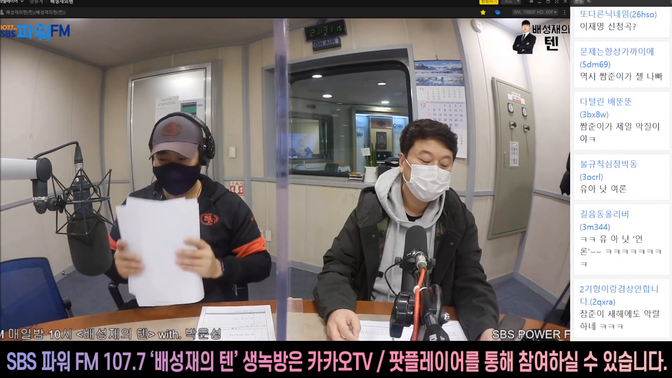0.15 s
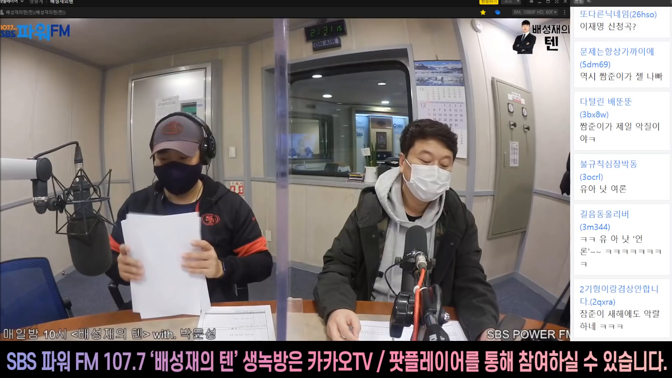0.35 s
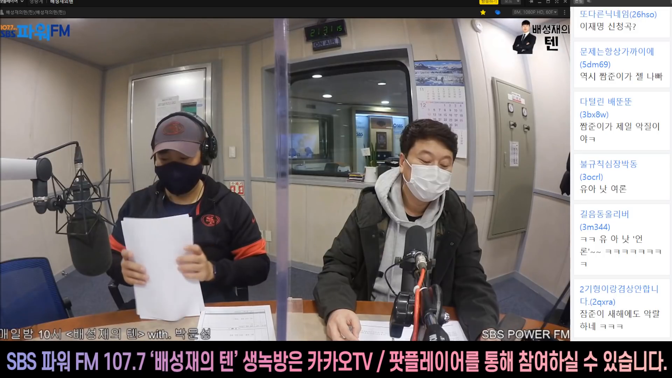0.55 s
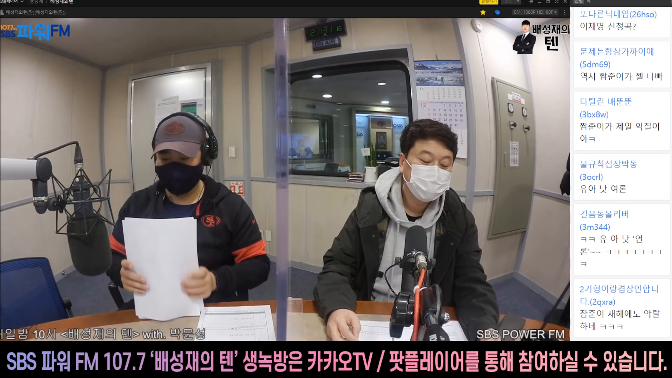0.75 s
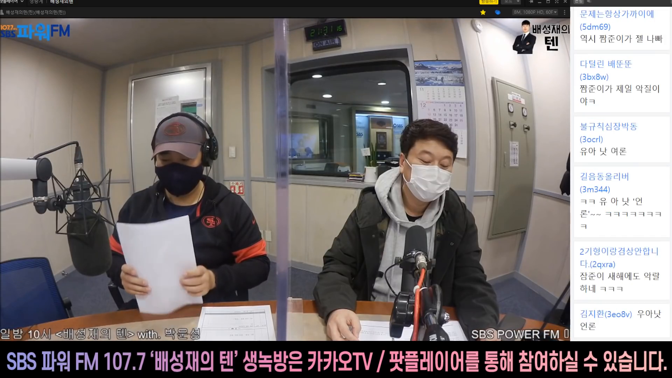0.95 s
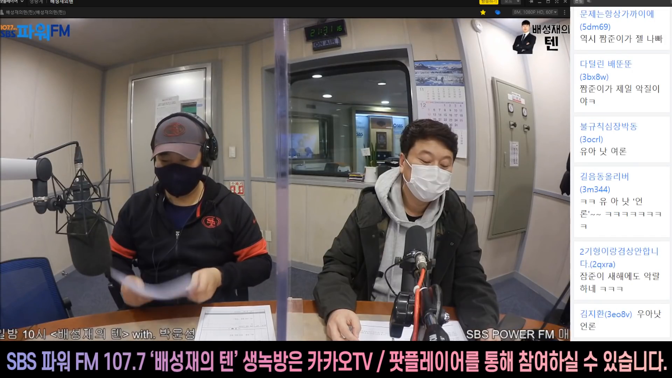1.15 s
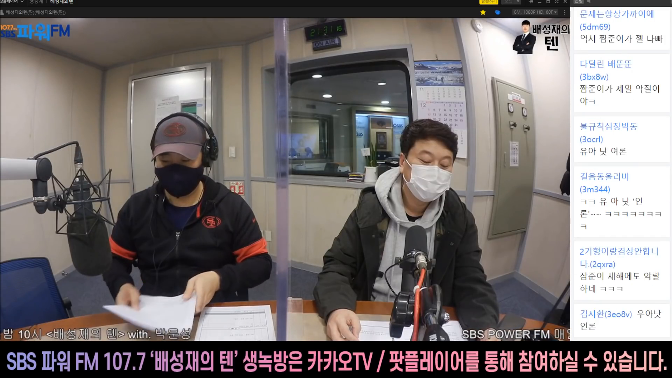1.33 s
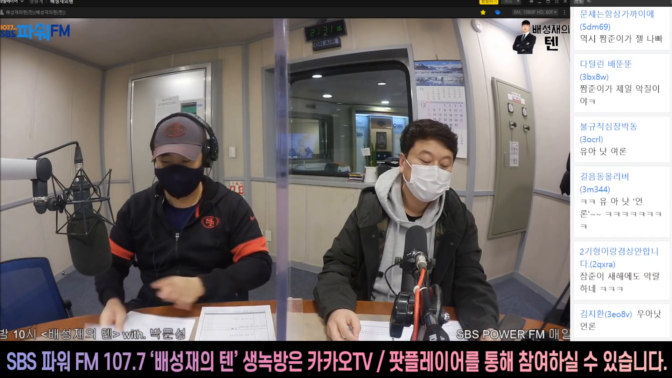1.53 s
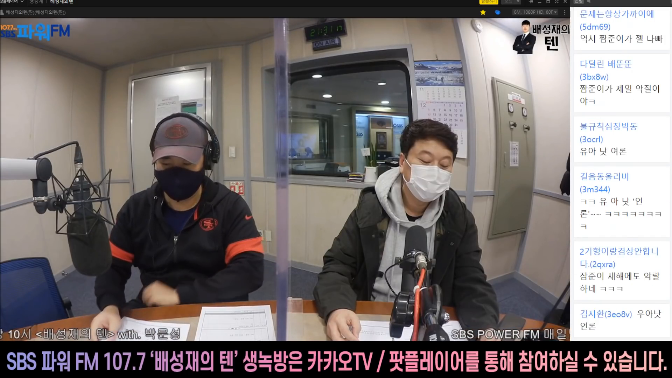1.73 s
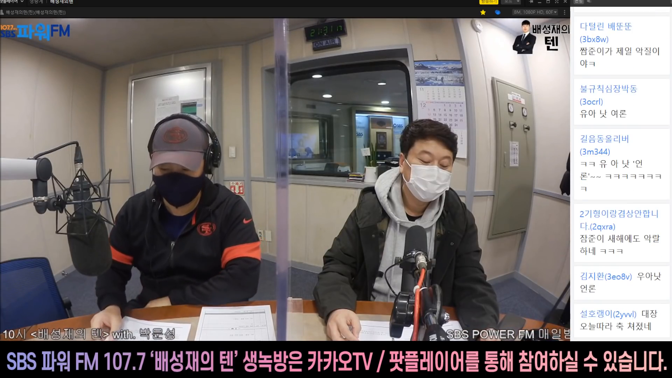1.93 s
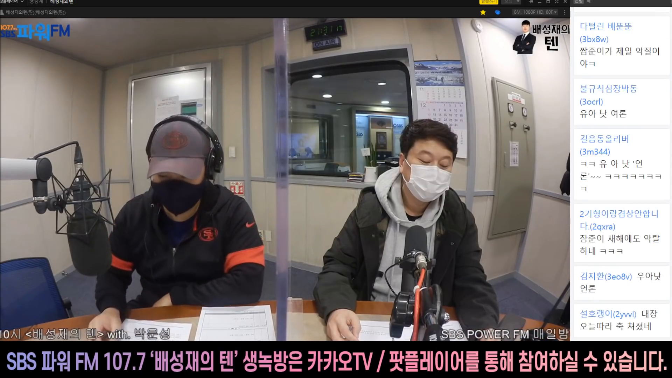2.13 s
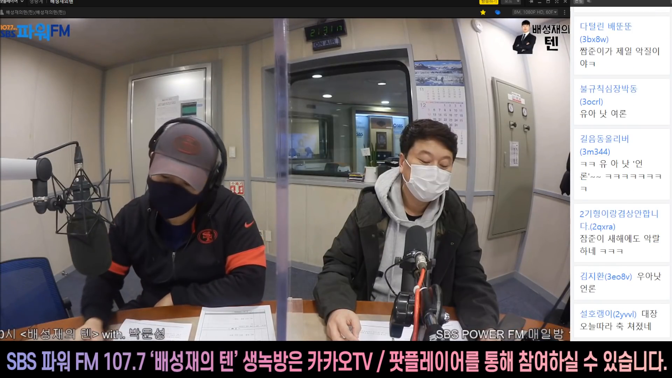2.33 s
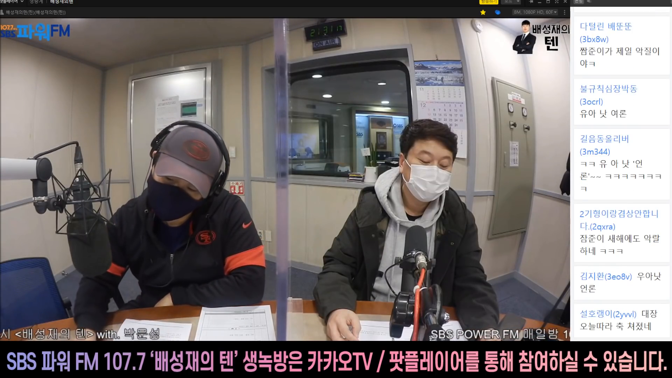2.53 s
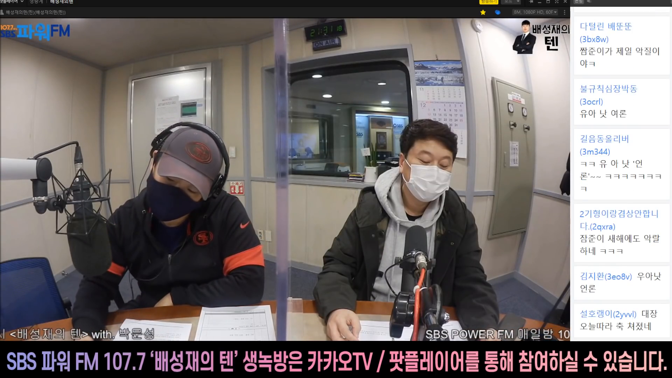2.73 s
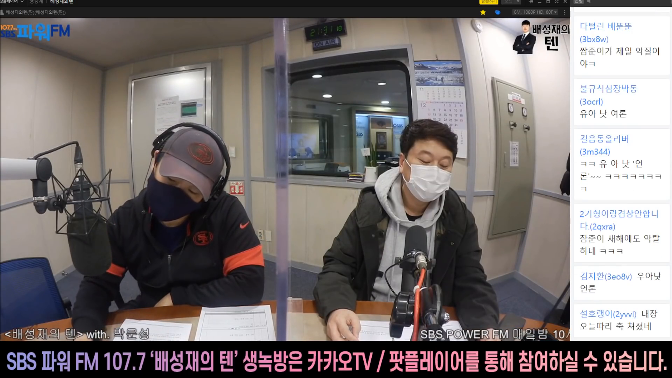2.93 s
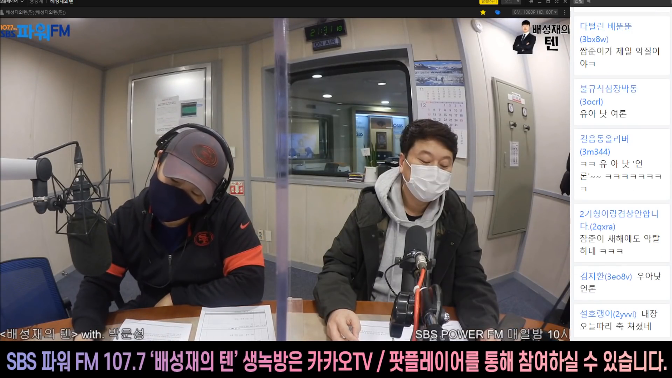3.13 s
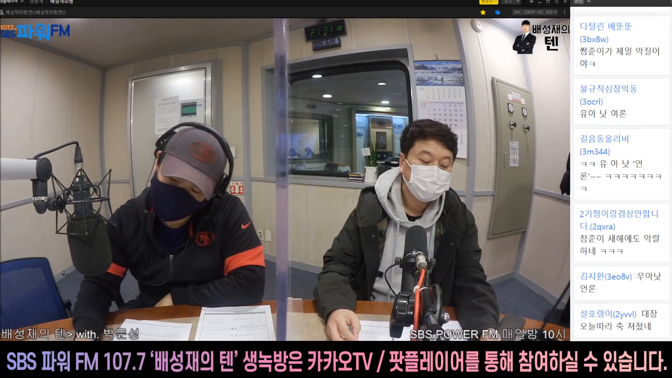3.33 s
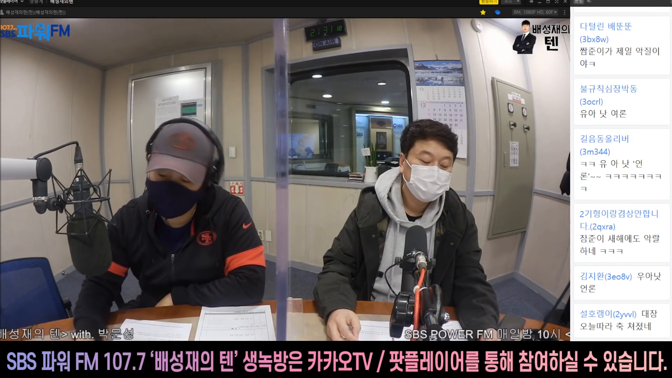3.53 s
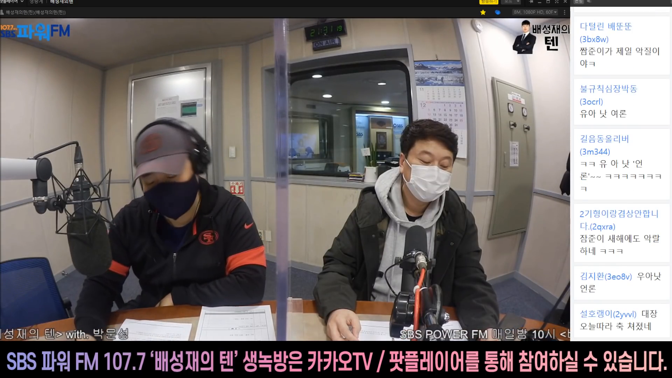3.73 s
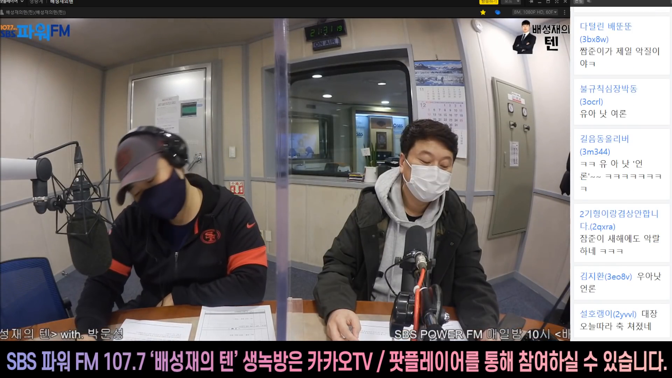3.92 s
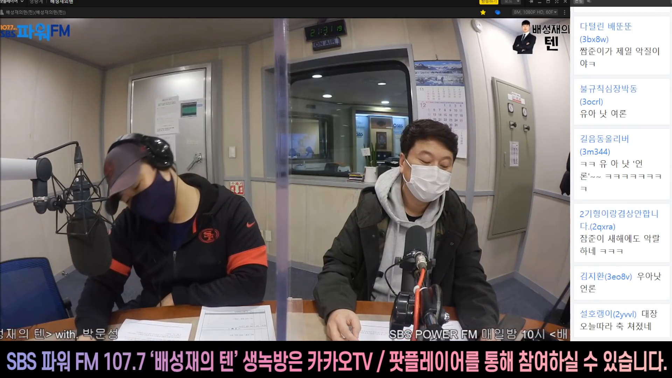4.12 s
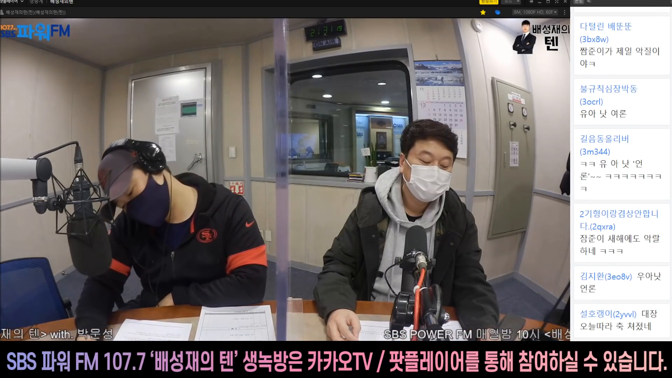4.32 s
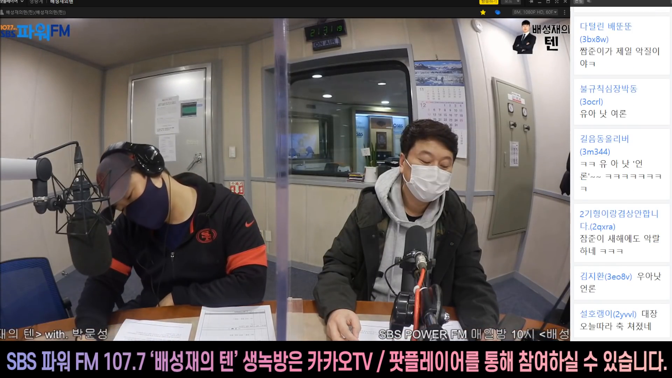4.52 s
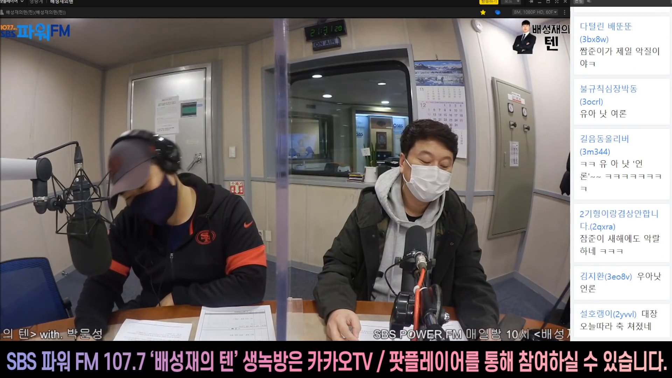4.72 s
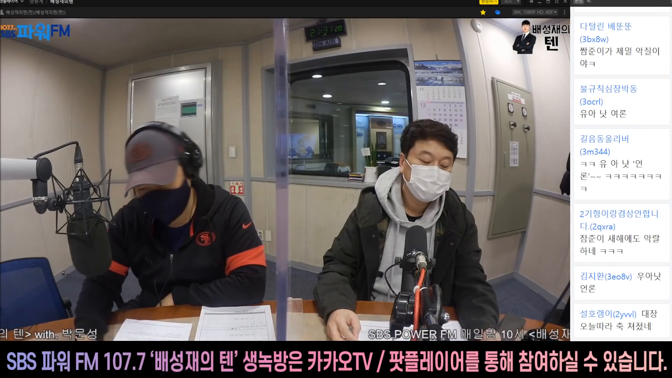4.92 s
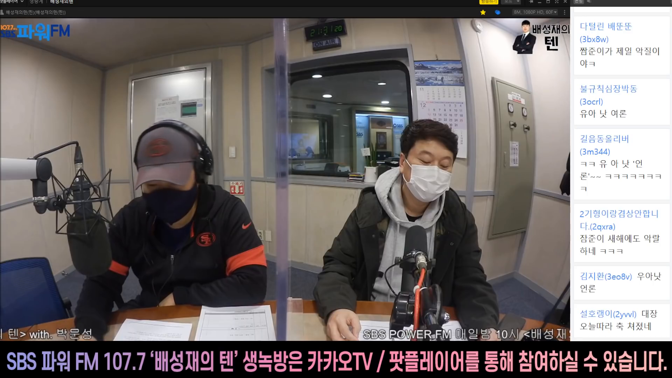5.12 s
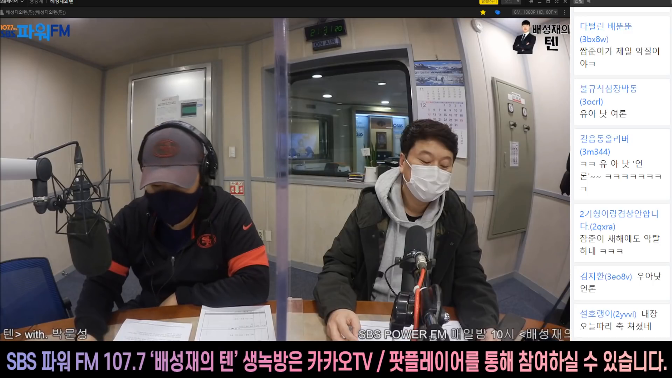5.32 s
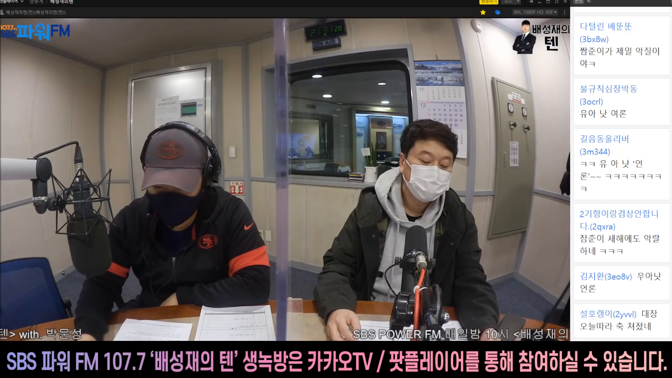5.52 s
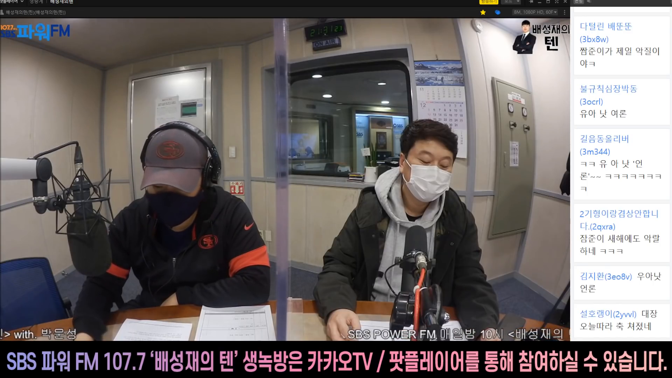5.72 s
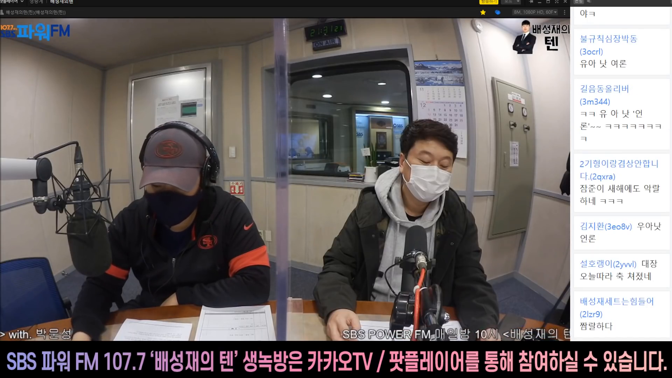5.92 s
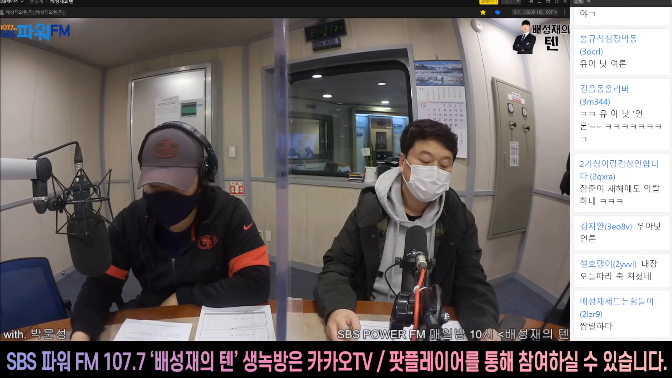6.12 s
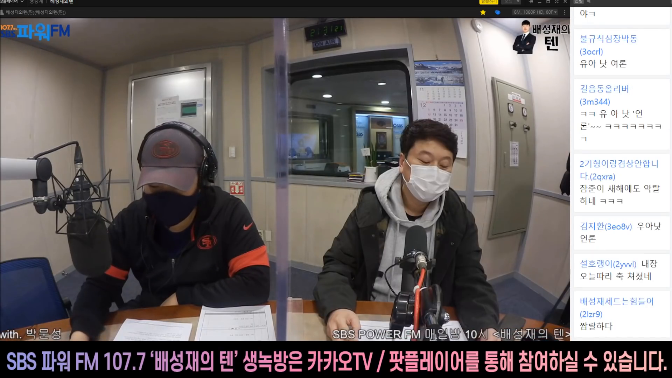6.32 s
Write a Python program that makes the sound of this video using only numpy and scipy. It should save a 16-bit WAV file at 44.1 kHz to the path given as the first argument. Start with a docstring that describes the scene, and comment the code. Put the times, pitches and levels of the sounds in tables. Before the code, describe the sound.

Close to a desk microphone in a small, dry studio, paper sheets rustle and crackle in quick strokes. A loud tap squares the stack at half a second, more shuffling follows, then a bright snap near 1.8 seconds as the sheets slide away. After a quiet gap come small ticks, a soft desk thump, a fine crackle and clicks, over faint ventilation.

```python
"""In a quiet, damped studio, sheets of paper are shuffled, squared on a desk and slid aside;
later small things tick and knock on the desk. Rubbing, crackle and knocks are filtered noise,
taps are damped rings with cracks, snaps are brief pulses, and thumps are decaying desk modes.
One microphone on the desk feels the low thump, over ventilation noise and a few thin equipment
tones; both channels carry the same signal."""
import sys
import numpy as np
from scipy import signal
from scipy.fft import rfft, irfft
from scipy.io import wavfile
from scipy.ndimage import uniform_filter1d

SR = 44100
rng = np.random.default_rng(int(sys.argv[2]) if len(sys.argv) > 2 else 0)


def dump_mix(stems):
    """Bounce the given channels to the path in sys.argv[1] as a 16-bit WAV at rate SR."""
    frames = np.atleast_2d(stems).T  # one column per channel
    limited = np.clip(frames, -1, 1)  # hard clip at full scale
    pcm = np.round(limited * 32767).astype(np.int16)
    wavfile.write(sys.argv[1], SR, pcm)


N = 284797  # length [samples]


def gain_of(db):
    """Level law: 20 dB is a factor of ten in amplitude."""
    return 10 ** (np.asarray(db) / 20)


def evened(x):
    """Normalization of x to unit rms amplitude."""
    return x / np.sqrt(np.mean(x ** 2) + 1e-20)


def coloured(x, points):
    """Linear filtering by a spectrum of (frequency [Hz], gain [dB]) points, joined over log frequency."""
    f, db = np.transpose(points)
    hz = np.fft.rfftfreq(len(x), 1 / SR)
    curve_db = np.interp(np.log(hz + 1), np.log(f + 1), db)
    return irfft(rfft(x) * gain_of(curve_db), len(x))


def around(hz, skirt_db):
    """Broad resonance: a hump of colour centred on hz."""
    return [(hz / 8, 2 * skirt_db), (hz / 2, skirt_db), (hz, 0), (hz * 1.33, skirt_db), (hz * 4, 3 * skirt_db)]


def add(mix, s, sound):
    """Superposition: adds a sound to the mix from time s [s]."""
    part = mix[round(s * SR):][:len(sound)]
    part += sound[:len(part)]


def patchy(x, patch_db, flicker_db):
    """Random modulation: drifting patches of colour and a flicker shared by all pitches."""
    z = signal.stft(x, nperseg=256, noverlap=192)[2]
    chance = rng.standard_normal(z.shape)
    across_pitch = uniform_filter1d(chance, size=3, axis=0)
    patches = evened(uniform_filter1d(across_pitch, size=36, axis=1))
    flicker = evened(uniform_filter1d(rng.standard_normal(z.shape[1]), size=5))
    varied = z * gain_of(patch_db * patches + flicker_db * flicker)
    return evened(signal.istft(varied, nperseg=256, noverlap=192)[1][:N])


def rubbing():
    """Stick-slip friction: fibres catch and slip thousands of times a second; each slip excites the sheet."""
    # colours of the scrape, the flutter of the sheet and the hiss of the fibres:
    # (frequency [Hz], gain [dB])
    scrape = [(900, -38), (1800, 1), (2600, 4.5), (4000, 2), (6000, -6), (8000, -26)]
    flutter = [(150, -16), (350, -3), (900, 1), (1600, -2), (2500, -30.5)]
    fibres = [(3500, -27.5), (5200, -5.5), (7000, 2.5), (9000, -2), (11500, -6.5), (14000, -27),
              (17000, -35.5)]
    # strokes of sheet on sheet, some over a long light contact: (start [s], length [s], rise [s],
    # scrape level [dB], flutter level [dB], hiss level [dB], change to the end [dB])
    strokes = [(0, 1.67, .01, -54, -57.5, -58.5, -5.5), (0, 0.057, 0.00092, -48.5, -50, -60, -14),
               (0.071, 0.13, 0.029, -48, -52, -48, 3.5), (0.239, 0.17, .03, -45.5, -59, -53, -5),
               (0.413, 0.081, 0.044, -44, -56.5, -46.5, 0), (0.502, 0.033, 0.0092, -60, -61, -37, -5),
               (0.631, 0.057, 0.022, -42, -46.5, -36.5, -3), (0.698, 0.047, .02, -40.5, -49, -45.5, 4.5),
               (0.775, .15, 0.027, -46.5, -51.5, -50.5, -3.5), (0.911, 0.1, .06, -43, -55, -51, 3.5),
               (1.033, 0.11, 0.027, -45.5, -59, -48.5, -3), (1.195, 0.072, 0.021, -51.5, -53, -58.5, 3.5),
               (1.281, 0.086, 0.016, -50.5, -71, -55.5, -5), (1.38, .13, 0.035, -53, -60, -60.5, -1),
               (1.515, 0.063, 0.026, -59, -60.5, -59, 0), (1.708, 0.1, 0.036, -47.5, -48.5, -57.5, -4.5),
               (1.794, 0.44, 0.044, -50.5, -57, -54, -17.5), (2.216, 0.051, 0.021, -59, -63.5, -62, -2),
               (2.262, 0.6, 0.061, -68.5, -65.5, -62.5, -5), (3.839, 0.032, 0.0076, -58, -61, -79, -6.5),
               (3.921, 0.052, 0.037, -68, -53.5, -82, -1.5), (4.064, .14, .02, -80, -62, -73, -2.5),
               (4.208, .2, 0.049, -74.5, -66.5, -74, -0.5), (4.443, 0.12, .02, -72, -56.5, -84, -8.5),
               (4.803, 0.015, .01, -58.5, -71, -77, -5), (5.047, 0.093, .04, -80, -76, -75, -2),
               (5.196, 0.27, 0.035, -75, -69.5, -69.5, -6), (5.438, 0.13, 0.017, -67, -70, -70, -3)]
    slips_per_s, lift_db_per_s = 9000, 400  # a stroke dies away when the hand lifts

    sizes = gain_of(0.69 * np.minimum(rng.exponential(1, N), 6.0))
    slips = sizes * rng.standard_normal(N) * (rng.random(N) < slips_per_s / SR)
    slips = patchy(slips, patch_db=2.5, flicker_db=0.18)
    layers = np.array([evened(coloured(slips, colour)) for colour in (scrape, flutter, fibres)])
    t, power = np.arange(N) / SR, np.zeros(layers.shape)
    for start, length, rise, *levels_db, change_db in strokes:
        at = slice(round(start * SR), round((start + length) * SR) + SR // 4)
        since = t[at] - start
        change = change_db * np.minimum(since / length, 1)
        lift = lift_db_per_s * np.maximum(since - length, 0)
        shape = np.clip(since / max(rise, .001), 0, 1) * gain_of(change - lift)
        power[:, at] += (gain_of(levels_db)[:, None] * shape) ** 2  # overlapping strokes add in power
    return (np.sqrt(power) * layers).sum(axis=0)


def air():
    """Stationary background: broadband ventilation noise, a fuzzy high whine and thin steady sinusoids."""
    # ventilation spectrum: (frequency [Hz], relative level per Hz [dB])
    ventilation = [(15, -67.5), (25, -40), (74, -11.5), (130, -0.5), (212, -6.5), (363, -11), (575, -16),
                   (659, -15.5), (775, -17), (887, -16), (1610, -20), (1740, -19.5), (2050, -24),
                   (9320, -30), (16000, -45)]
    # narrow band of the whine: (frequency [Hz], gain [dB])
    whine_band = [(9150, -46), (9330, -3), (9400, 0), (9450, -4.5), (9600, -42)]
    # steady equipment tones: (frequency [Hz], rms level [dB])
    steady_tones = [(1723, -74.5), (1938, -78)]
    ventilation_db, whine_db = -62, -86.5  # rms levels

    noise = evened(coloured(rng.standard_normal(N), ventilation))
    whine = gain_of(whine_db) * evened(coloured(rng.standard_normal(N), whine_band))
    t, tones = np.arange(N) / SR, np.zeros(N)
    for hz, db in steady_tones:
        tones += gain_of(db) * np.sqrt(2) * np.sin(2 * np.pi * (hz * t + rng.random()))
    return gain_of(ventilation_db) * patchy(noise, patch_db=1.0, flicker_db=0.55) + tones + whine


def taps():
    """Impact excitation: each contact is a short unsteady ring and a dying crack of noise."""
    # taps and crumples: (time [s], ring level [dB], ring frequency [Hz], ring T60 [s],
    # crack level [dB], crack frequency [Hz])
    contacts = [(.004, -33, 720, 0.017, -45, 3190), (.089, -34, 2230, .024, -39, 3840),
                (0.132, -31.5, 635, 0.03, -32, 4580), (.247, -38.5, 950, .02, -29.5, 4070),
                (.324, -33.5, 1160, .039, -36, 2600), (.512, -6, 932, 0.022, -12.5, 2550),
                (0.526, -23, 870, 0.035, -30, 3400), (.53, -18.5, 1270, 0.019, -24, 3780),
                (.542, -21, 796, 0.021, -37, 2530), (.553, -38, 595, .018, -47, 2620),
                (.667, -49, 1900, .022, -27, 2660), (.697, -37, 2150, .015, -28, 3800),
                (.725, -17, 2260, 0.014, -18.5, 2500), (0.738, -27, 2080, 0.027, -24.5, 2810),
                (.831, -26, 1165, 0.064, -35.5, 2600), (0.93, -31.5, 1620, 0.031, -38, 3040),
                (1.015, -34, 2060, .026, -28.5, 3230), (1.108, -34, 1290, .022, -35, 4170),
                (1.198, -37, 1290, 0.025, -49, 3780), (1.212, -34.5, 2130, .022, -40, 2650),
                (1.232, -28, 910, 0.027, -47, 2000), (1.257, -31, 1386, 0.039, -31.5, 2600),
                (1.454, -39.5, 633, 0.034, -37, 3600), (1.466, -28.5, 1590, 0.02, -44, 2790),
                (1.487, -26, 850, 0.011, -51, 3330), (1.549, -40.5, 620, 0.032, -40.5, 3580),
                (1.672, -24.5, 950, .02, -46, 2560), (1.689, -36, 885, 0.039, -43.5, 2610),
                (1.725, -36, 996, .025, -52, 2646), (1.736, -31.5, 914, .035, -42, 3300),
                (1.755, -27.5, 900, 0.041, -38, 6980), (1.775, -18, 1745, 0.015, -37, 2600),
                (1.822, -31.5, 885, .048, -45, 2510), (2.243, -46.5, 980, .031, -62, 6280),
                (3.499, -39.5, 1163, 0.045, -61.5, 3220), (3.739, -52.5, 1140, 0.027, -58, 2510),
                (3.841, -38, 1080, 0.016, -44.5, 4730), (3.921, -33.5, 1003, 0.032, -49, 3370),
                (3.957, -34.5, 1100, .034, -38.5, 2380), (3.98, -55, 870, .017, -44, 2490),
                (4.058, -34, 855, 0.02, -53, 3640), (4.077, -41.5, 1266, 0.077, -38.5, 4730),
                (4.113, -43, 1090, 0.02, -49, 2590), (4.156, -34, 1515, 0.055, -40.5, 2780),
                (4.437, -24.5, 2180, 0.019, -26.5, 8400), (4.443, -30.5, 1213, .034, -29, 2600),
                (4.515, -29, 1220, 0.068, -39.5, 5000), (4.808, -46.5, 2070, 0.042, -44.5, 7600),
                (4.847, -39.5, 710, 0.012, -50.5, 3000), (6.383, -50, 1060, .025, -66, 3240)]
    rise_s, crack_t60_s = 0.00093, 0.02
    settle_db, settle_t60_s = -16.5, 0.21  # level against the crack
    overtone, overtone_db = 1.45, -9  # a second, unrelated pitch: frequency ratio, level against the first

    t, out = np.arange(4096) / SR, np.zeros(N)
    chance = rng.standard_normal((len(contacts), 2, len(t)))
    onset = 1 - np.exp(-t / rise_s)
    for (s, ring_db, hz, ring_t60, crack_db, crack_hz), (noise, drift) in zip(contacts, chance):
        sway = evened(uniform_filter1d(drift, size=60))
        turns = np.cumsum(hz * (1 + 0.14 * sway)) / SR  # the pitch wanders by 14 % rms
        first = np.sin(2 * np.pi * turns)
        second = gain_of(overtone_db) * np.sin(2 * np.pi * overtone * turns)
        ring_decay = gain_of(ring_db - 60 * t / max(ring_t60, .002))
        add(out, s, (first + second) * onset * ring_decay)
        crack = evened(coloured(noise, around(crack_hz, skirt_db=-5.0))) * onset
        add(out, s, crack * gain_of(crack_db - 60 * t / crack_t60_s))
        # the sheet keeps settling for a moment, in uneven bursts
        settling_db = crack_db + settle_db - 60 * t / settle_t60_s + 2.38 * sway
        add(out, s, crack * gain_of(settling_db))
    return out


def knocks():
    """Heavily damped impact: a low puff of noise that swells in a few milliseconds and dies."""
    # dull knocks of the stack or a hand: (time [s], level [dB])
    blows = [(.004, -40), (.089, -40.5), (.247, -50), (.324, -39), (.512, -20.5), (.527, -28),
             (.553, -29.5), (.667, -38.5), (.739, -35.5), (1.015, -47), (1.255, -50), (1.399, -48.5),
             (1.673, -53), (1.74, -49.5), (4.058, -44.5), (4.11, -48), (4.224, -47), (4.443, -44.5),
             (4.846, -45)]
    # their colour: (frequency [Hz], gain [dB])
    dull = [(60, -47.5), (120, -27.5), (250, 3), (450, -1.5), (800, -17), (2500, -59)]
    rise_s, t60_s = 0.003, 0.072

    t, out = np.arange(4096) / SR, np.zeros(N)
    shape = (1 - np.exp(-t / rise_s)) * gain_of(-60 * t / t60_s)
    chance = rng.standard_normal((len(blows), len(t)))
    for (s, db), noise in zip(blows, chance):
        add(out, s, gain_of(db) * shape * evened(coloured(noise, dull)))
    return out


def room(x):
    """Reverberation: sparse reflections of random sign, each band dying at its own speed."""
    # decay of the room: (frequency [Hz], T60 [s])
    decay = [(200, 0.083), (1000, 0.069), (4000, 0.076), (12000, 0.097)]

    size = SR // 3
    echoes = np.zeros(size)
    at = np.arange(200, size - 20, 20)
    echoes[at + rng.integers(0, 20, len(at))] = rng.choice([-1., 1.], len(at))
    hz, t, z = signal.stft(echoes, SR, nperseg=256)
    f, t60 = np.transpose(decay)
    dying = gain_of(-60 * t / np.interp(hz, f, t60)[:, None])
    tail = signal.istft(z * dying, SR, nperseg=256)[1]
    return signal.fftconvolve(x, tail / np.linalg.norm(tail))[:N]


def crackle():
    """Random point process: tiny creases give way while a sheet bends, swelling and fading."""
    # bouts of fine crackle: (start [s], end [s], mean rate [pops/s], base level [dB], frequency [Hz])
    bouts = [(0.058, .22, 300, -42, 4500), (0.269, .5, 248, -44, 3500), (.64, .76, 300, -42, 4000),
             (0.927, 1.15, 250, -53, 3000), (1.204, 1.3, 270, -33, 1800), (1.36, 1.6, 200, -67, 2200),
             (1.723, 1.828, 255, -42, 1500), (3.84, 4.2, 230, -66, 3000), (5.199, 5.53, 350, -61, 8000),
             (5.297, 5.55, 560, -57, 3000)]

    out = np.zeros(N)
    puff = np.exp(-np.arange(90) / 19.0)  # time constant 19 samples
    for start, end, per_s, db, hz in bouts:
        size = round((end - start) * SR)
        sizes = gain_of(db + 7.1 * np.minimum(rng.exponential(1, SR // 2), 3.0))
        pops = sizes * (rng.random(SR // 2) < per_s / SR)
        puffs = np.convolve(pops, puff, "same") * rng.standard_normal(SR // 2)
        swell = signal.windows.tukey(size, .6)
        add(out, start, coloured(puffs, around(hz, skirt_db=-8.5))[:size] * swell)
    return out


def desk():
    """Modal vibration: the desk top swings up quickly and rings in its low modes."""
    # knocks that shake the desk top: (time [s], level [dB])
    thumps = [(0.279, -48), (0.507, -47.5), (0.752, -31.5), (1.426, -64), (1.583, -64), (3.553, -58.5),
              (3.616, -60.5), (3.742, -61), (3.854, -53), (4.161, -55), (4.454, -38.5), (4.847, -59.5)]
    # modes of the desk top: (frequency [Hz], relative level [dB], T60 [s])
    modes = [(128.9, 1, 0.38), (150.2, -1, 0.25), (204, -11, 0.21), (237, -14, 0.096), (337, -15, 0.24)]

    t, out = np.arange(SR // 2) / SR, np.zeros(N)
    swing = sum(gain_of(db - 60 * t / t60) * np.sin(2 * np.pi * hz * t) for hz, db, t60 in modes)
    swing *= 1 - np.exp(-t / 0.0017)  # rise time constant [s]
    for s, db in thumps:
        add(out, s, gain_of(db) * swing)
    return coloured(out, [(40, -32.5), (105, 1.0)])  # the stand passes little below the first mode


def snaps():
    """Sudden release: a crease lets go in a cycle or two with a bright edge, then faint scattered noise."""
    # dry snaps and ticks: (time [s], level [dB], frequency [Hz], edge level against the snap [dB])
    releases = [(0.5542, -28, 2300, -14), (.729, -18.5, 2410, -16), (1.232, -26, 1860, -15),
                (1.7824, -7.5, 2860, -12.5), (1.7956, -14, 2920, -11), (2.4848, -49, 2200, 5),
                (2.5574, -32, 6170, -9.5), (3.5617, -51, 2370, -2.5), (3.5982, -50.5, 2100, 0),
                (3.6223, -54, 2150, -3), (3.719, -55.5, 3010, -2), (3.7798, -45, 5660, -4),
                (3.8855, -44, 3190, 2), (3.9575, -41, 1880, -12), (3.995, -38.5, 7050, -13),
                (4.1767, -41.5, 2600, 0), (4.4378, -28.5, 5000, -6), (4.5148, -32, 1740, -5),
                (4.8475, -45, 2900, -17), (5.0432, -49, 2200, -5), (5.2111, -53, 3300, -2),
                (5.238, -42.5, 6270, -10), (5.2634, -53, 3480, -8), (5.2804, -48, 7300, -2),
                (5.307, -42, 6680, -6), (5.3322, -46, 3540, -2), (5.343, -44, 3700, -8),
                (5.359, -39.5, 2110, -2), (5.3703, -41, 2110, -3), (5.3887, -44, 2110, -4),
                (5.4066, -42, 3600, -5), (5.4224, -47, 2230, -4), (5.4542, -39.5, 3240, -8),
                (5.464, -36.5, 2630, -8), (5.4925, -27.5, 4700, -14), (5.499, -41, 6000, -5),
                (5.5287, -26.5, 9200, -4), (5.7443, -55.5, 2280, 4)]
    # colour of the edge: (frequency [Hz], gain [dB])
    bright = [(600, -31), (2000, 3), (4000, 2), (9000, 3), (12000, -18.5), (16000, -25)]
    edge_t60_s, scatter_db, scatter_t60_s = 0.0068, -14.5, 0.015  # scatter level is against the snap

    t, out = np.arange(2048) / SR, np.zeros(N)
    chance = rng.standard_normal((len(releases), len(t)))
    for (s, db, hz, edge_db), noise in zip(releases, chance):
        pulse = -1.3 * np.sin(2 * np.pi * hz * t) * np.exp(-(t * hz / 0.95 - .6) ** 2)
        edge = gain_of(edge_db - 60 * t / edge_t60_s) * evened(coloured(noise, bright))
        scattered = evened(coloured(noise, around(hz, skirt_db=-14.0)))
        scatter = gain_of(scatter_db - 60 * t / scatter_t60_s) * scattered
        add(out, s + 0.001, gain_of(db) * (pulse + edge + scatter))  # begins 1 ms after the listed time
    return out


def scene():
    """Superposition of direct sound, reverberation, desk vibration and background in two equal channels."""
    # fingers and paper dull every tap and knock: (frequency [Hz], gain [dB])
    soft_contact = [(60, -11.5), (300, -0.5), (8000, -1.5), (11000, -6), (16000, -26.5)]
    # a sheet radiates little bass: (frequency [Hz], gain [dB])
    thin_sheet = [(80, -38.5), (500, -2), (11000, -2), (16000, -11)]

    blows = coloured(taps() + knocks(), soft_contact)
    creases = coloured(snaps(), thin_sheet) + crackle()
    near = rubbing() + blows + creases
    mono = near + gain_of(-13.5) * room(near) + desk() + air()
    return np.array([mono, mono])


def record(dry):
    """Band limitation: the bass cut of the microphone, then a steep treble limit."""
    bass_cut_hz, treble_limit_hz = 70, 15800
    bass_cut = signal.butter(2, bass_cut_hz, "high", fs=SR, output="sos")
    cut = signal.sosfilt(bass_cut, dry)
    limit = signal.firwin(511, treble_limit_hz, window=("kaiser", 9), fs=SR)
    return signal.oaconvolve(cut, limit[None], "same")


dry = scene()
out = record(dry)
dump_mix(out)
```